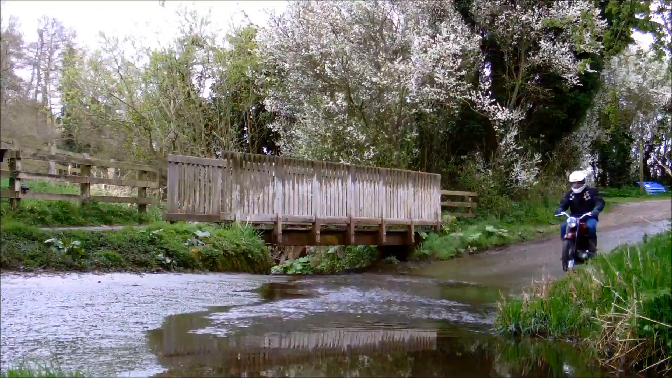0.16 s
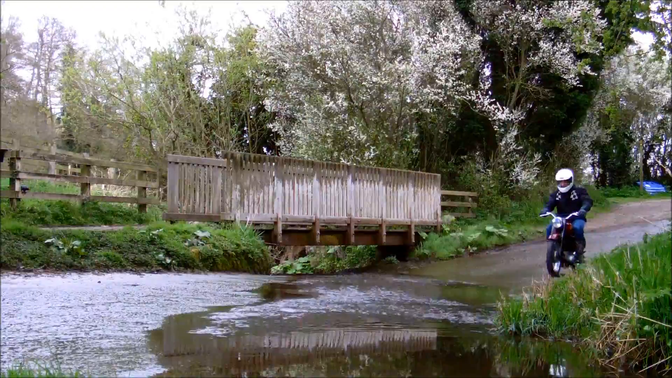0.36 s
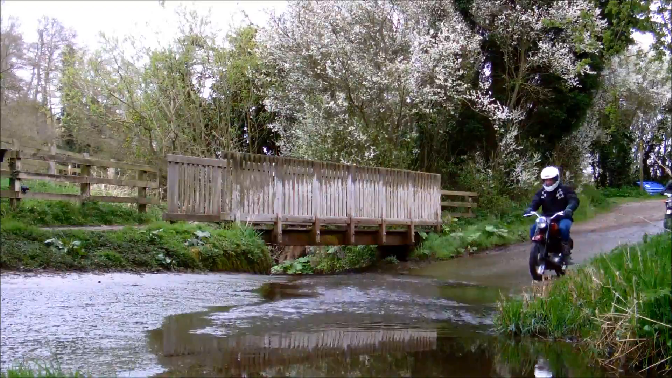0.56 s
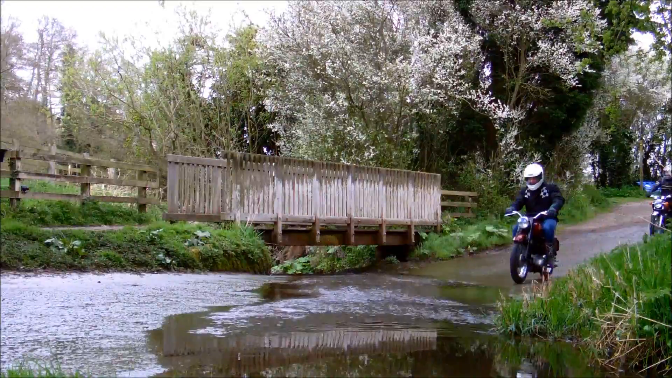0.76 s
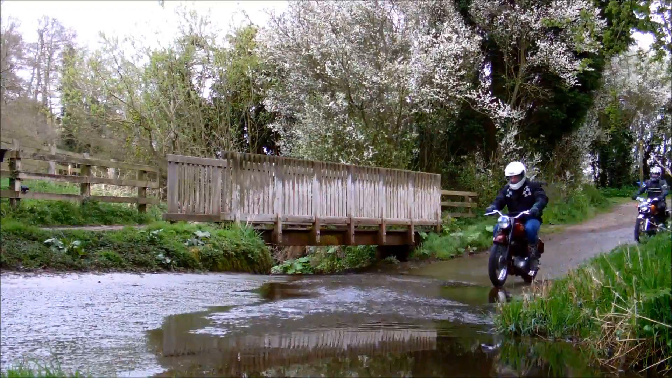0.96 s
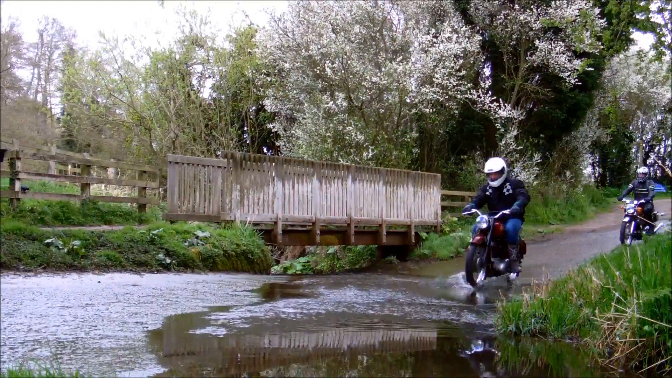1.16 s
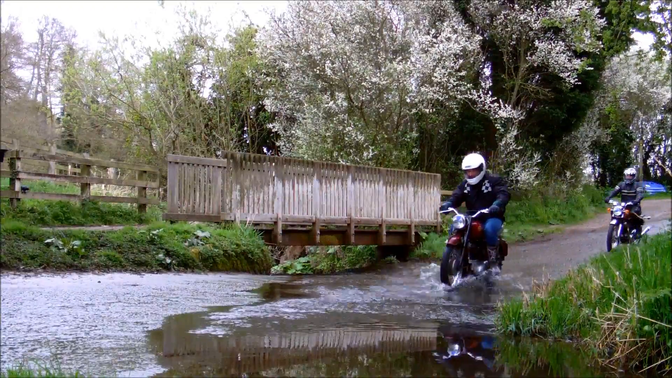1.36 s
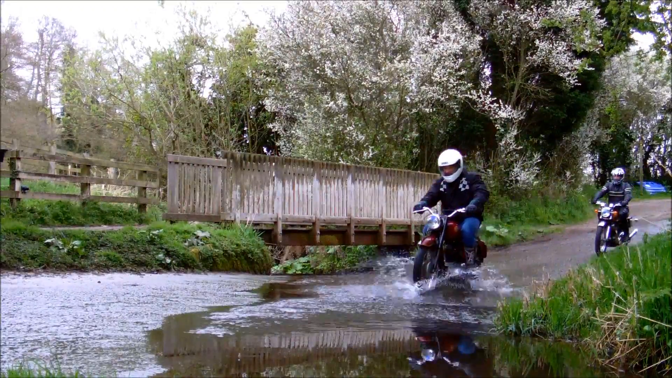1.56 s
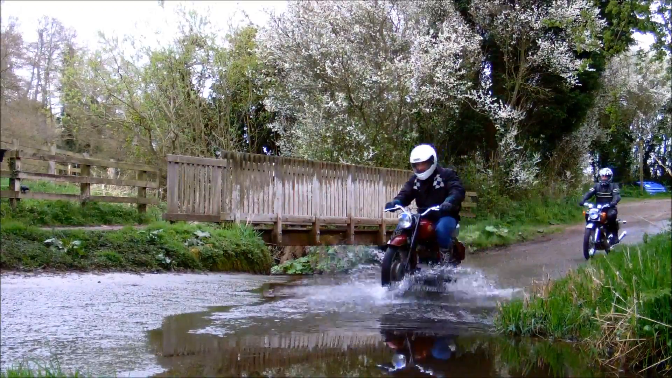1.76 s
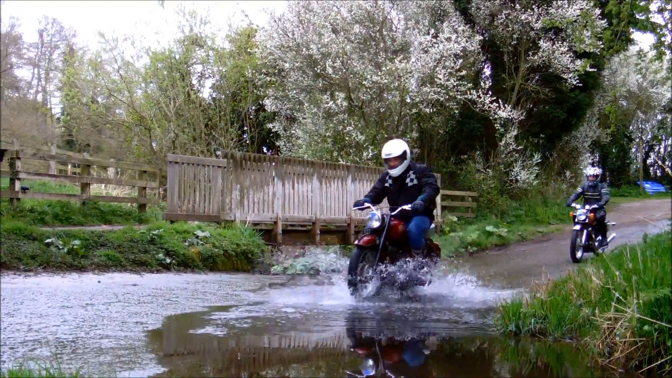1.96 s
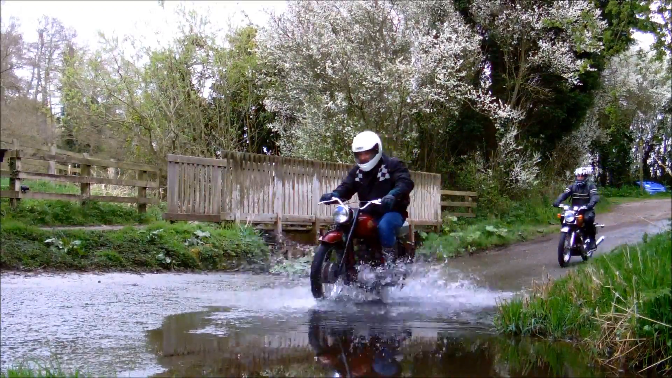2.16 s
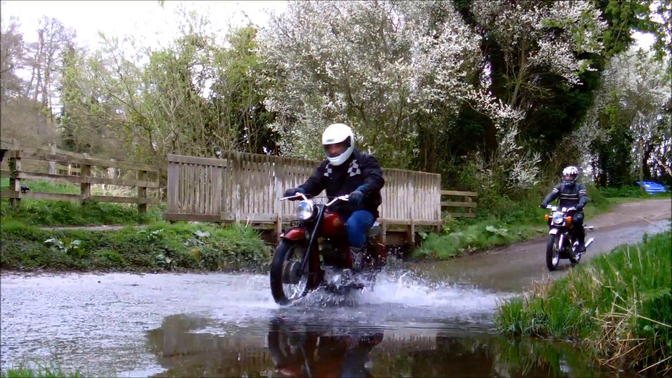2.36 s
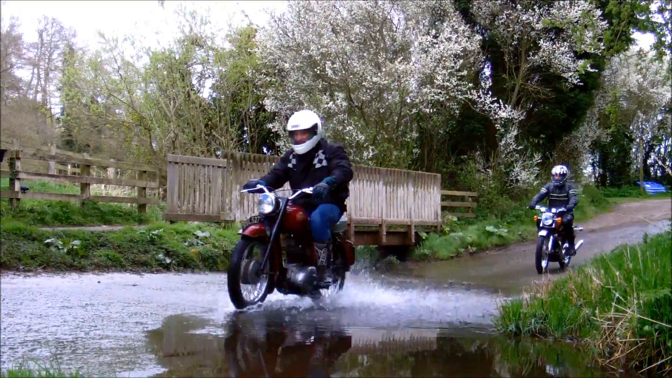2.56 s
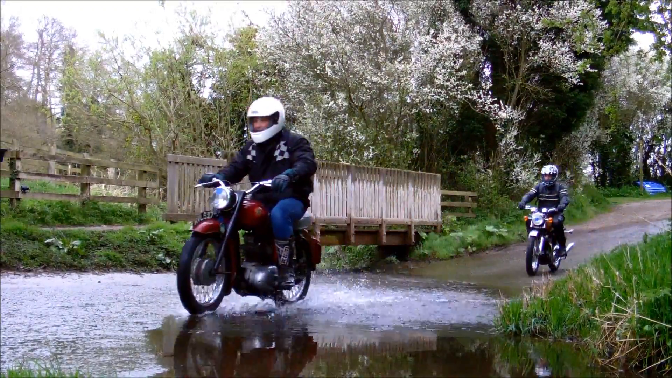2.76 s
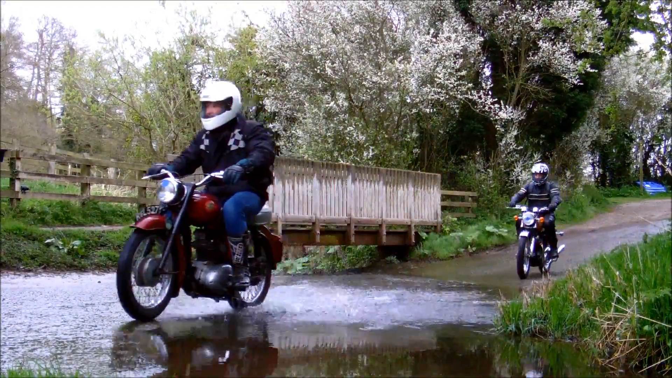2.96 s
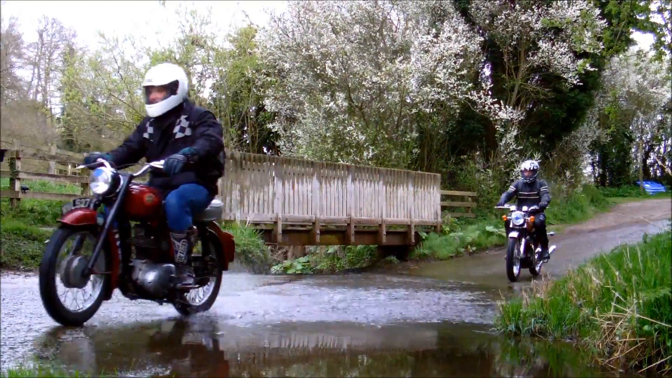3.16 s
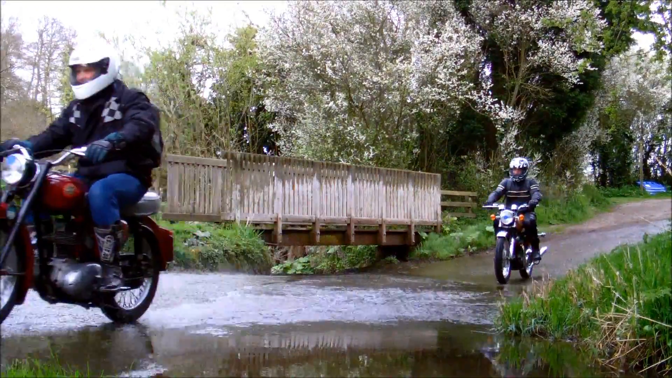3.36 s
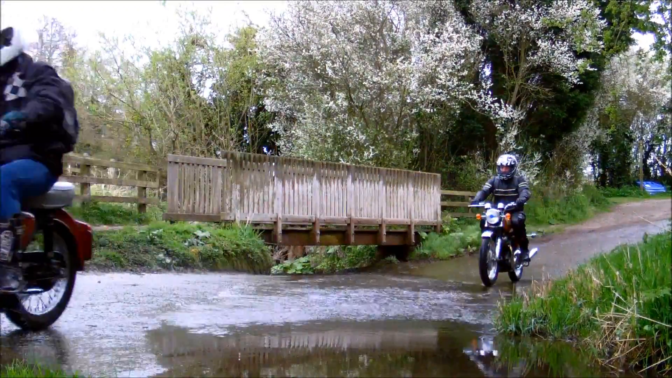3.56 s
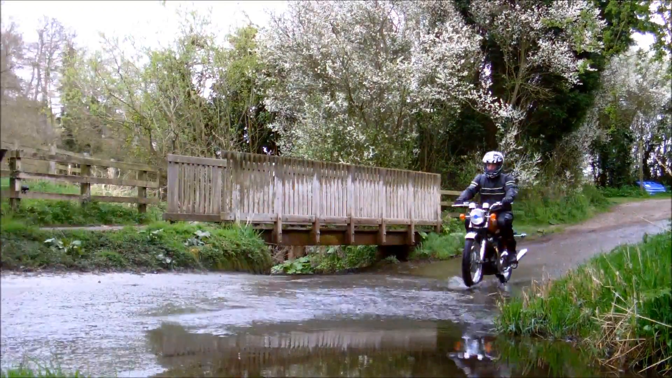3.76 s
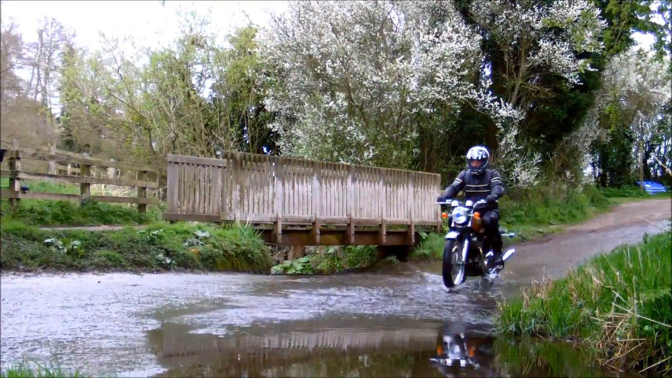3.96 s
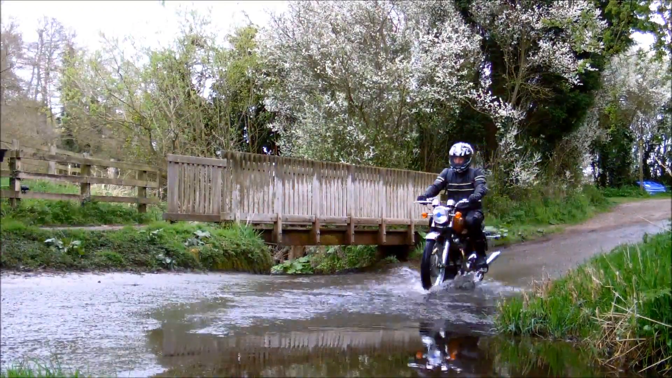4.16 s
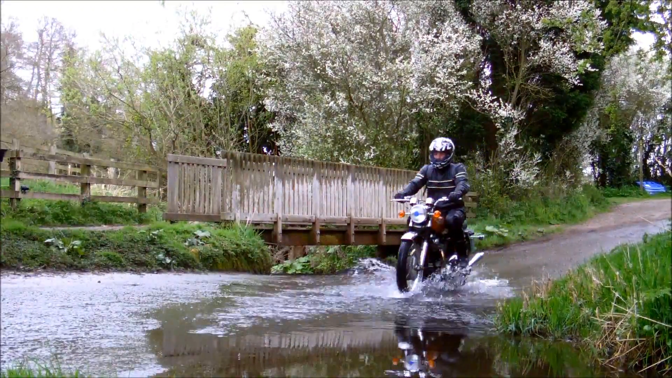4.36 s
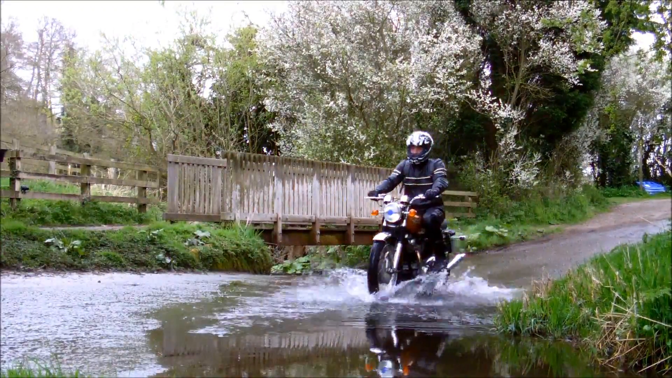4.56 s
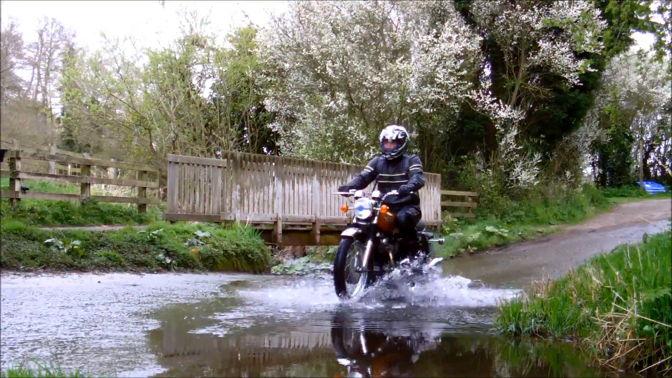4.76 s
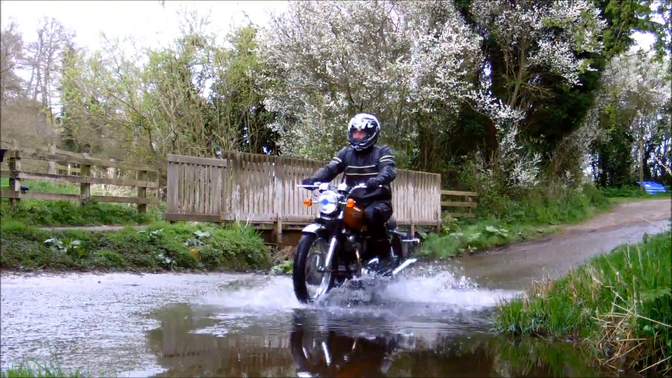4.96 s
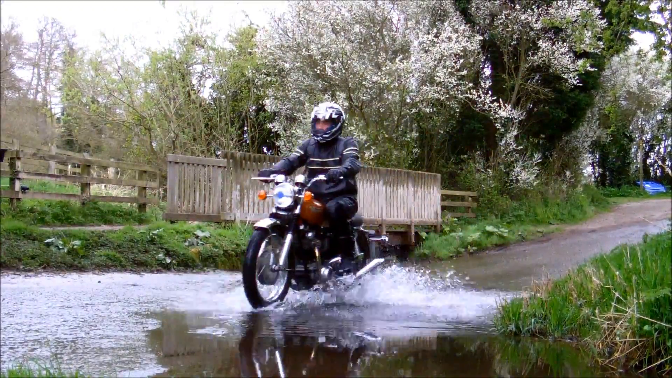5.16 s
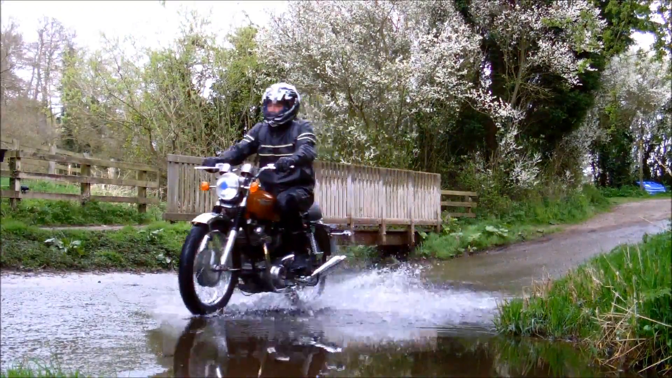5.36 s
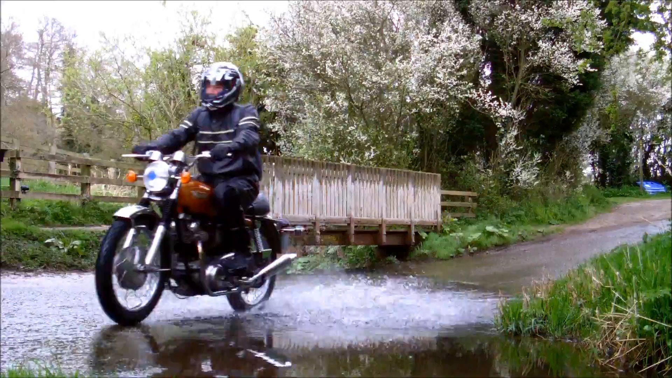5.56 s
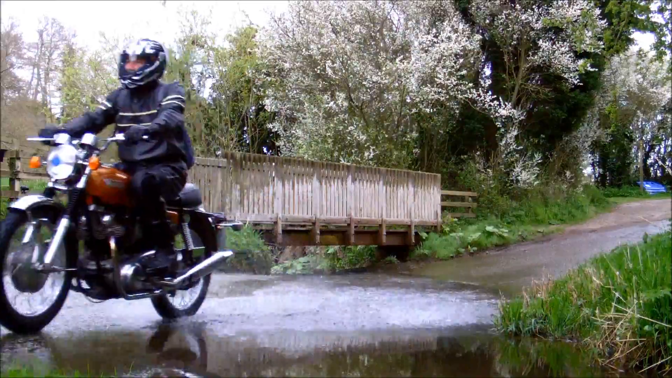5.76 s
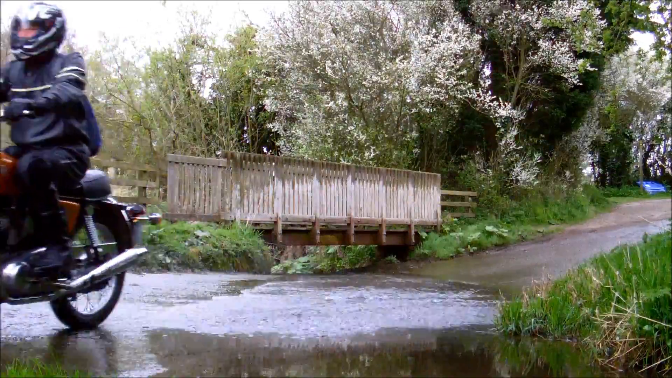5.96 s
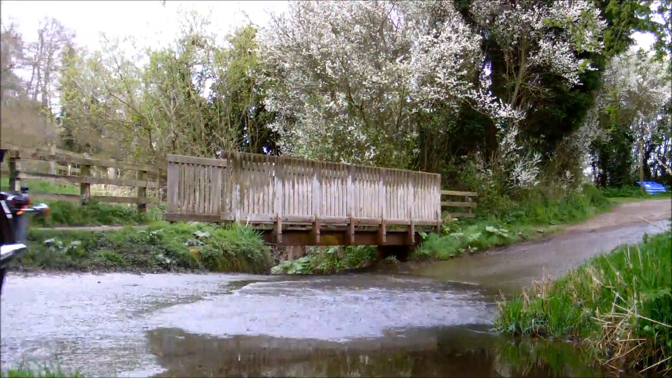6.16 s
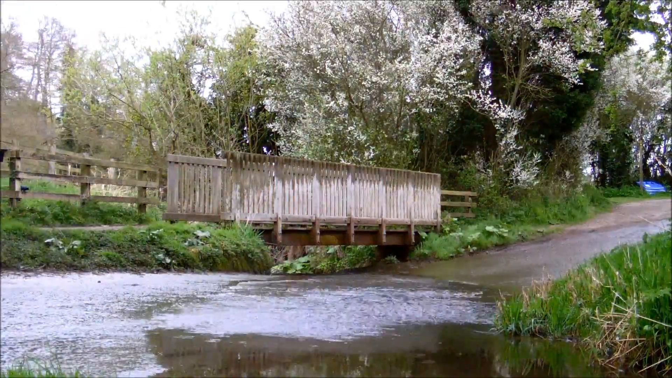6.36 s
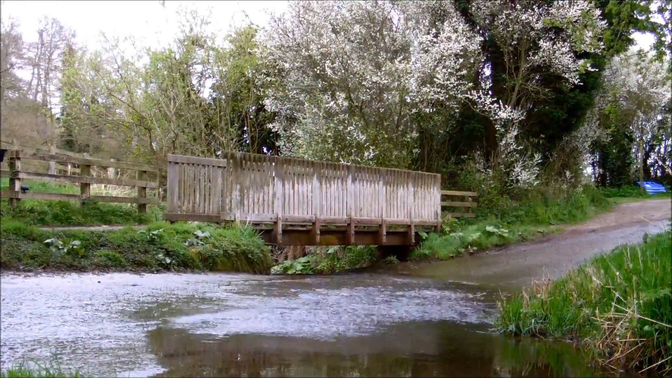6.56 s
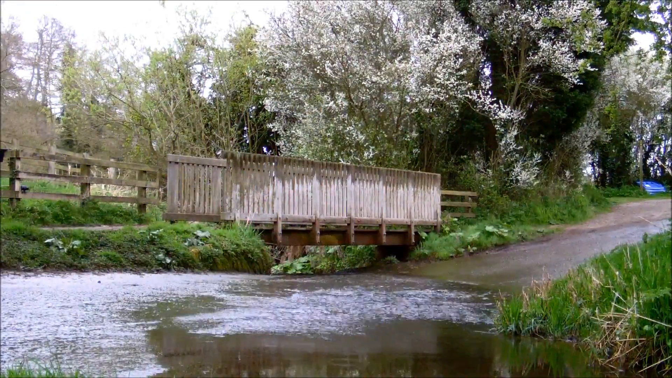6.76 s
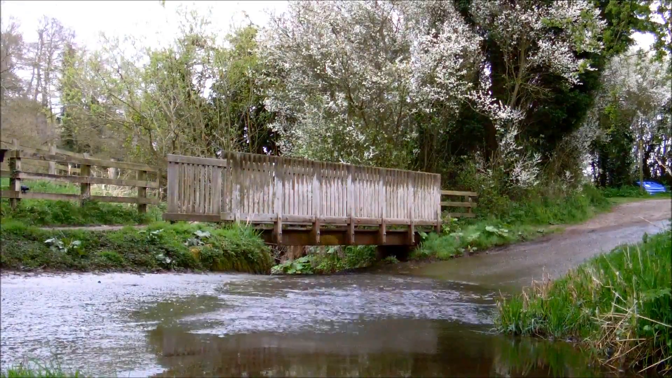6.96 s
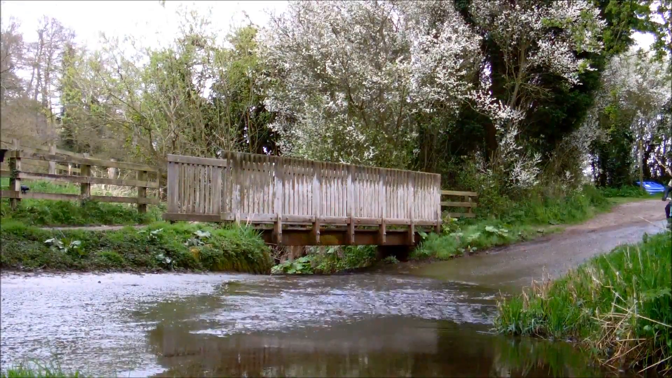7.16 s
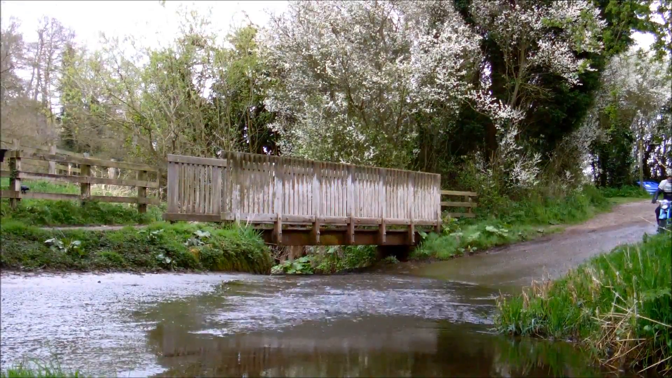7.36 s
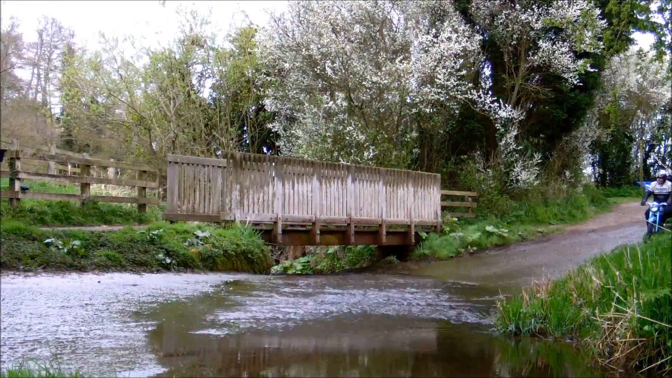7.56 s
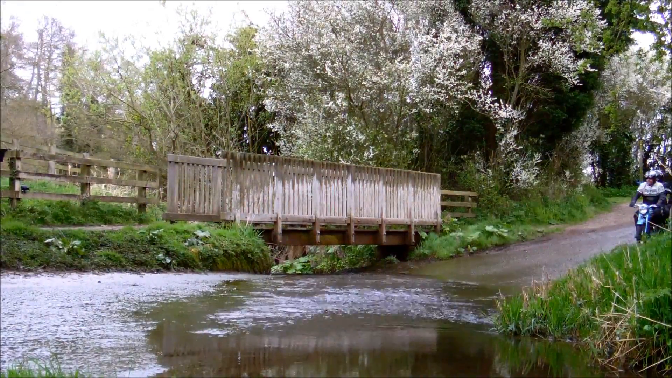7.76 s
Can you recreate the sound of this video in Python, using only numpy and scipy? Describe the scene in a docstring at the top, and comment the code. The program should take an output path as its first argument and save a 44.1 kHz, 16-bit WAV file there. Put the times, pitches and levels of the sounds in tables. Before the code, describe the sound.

An old four-stroke motorcycle approaches outdoors with a thumping exhaust and ticking valves, a second one behind it, over the soft, steady hiss of a stream. At about 1 second the first eases off and enters shallow water; spray builds, with slapping splashes between 2 and 2.5 seconds. Near 2.8 seconds it accelerates, gives one sharp exhaust crack at 3.2 and passes close at about 4 seconds, its pitch rising as it moves away. The second enters the water at that moment, splashing hardest from 4.8 to 5.5 seconds. It opens up and passes at about 6.3 seconds with a harder, chattering engine, its exhaust crackling rapidly and sharply as it leaves. The spray dies down and the engines recede, still climbing in pitch, while fine drops fizz on the water until the end, near 8 seconds. Trees add a faint, dull echo.

```python
"""Two old four-stroke motorcycles ride through a shallow ford over a hissing stream.
At 1 s the first enters the water and throws spray; each engine cycle gives an exhaust thump, a rasp
of gas and a clatter of valves. It opens up and passes the microphone at 3.9 s, as the second enters.
The second opens up too and passes at 6.3 s; as it leaves, its silencers face the microphone and
crack sharply. Fine drops fizz on the water to the end."""
import sys
import numpy as np
from scipy import signal
from scipy.fft import rfft, irfft
from scipy.io import wavfile
from scipy.ndimage import uniform_filter1d

SR = 44100
rng = np.random.default_rng(int(sys.argv[2]) if len(sys.argv) > 2 else 0)


def dump(signal):
    """Clip the signal to [-1, 1] and save it as 16-bit WAV at the path in sys.argv[1]."""
    limited = np.clip(np.atleast_2d(signal).T, -1, 1)
    pcm = np.round(limited * 32767).astype(np.int16)
    wavfile.write(sys.argv[1], SR, pcm)


N = 343980
TIME = np.arange(N) / SR

# Straight rides. Each: time abreast in s, speed in m/s, nearest distance in m.
FIRST_RIDE = (3.933, 3.61, 3.32)
SECOND_RIDE = (6.314, 3.48, 3.44)
# Each row: time in s, opening 0-1.
SECOND_THROTTLE = [(0, .1), (5.1, .1), (5.8, 1), (7.07, .98), (7.16, .55), (7.42, 0.99), (7.8, 0.62)]
# Exhaust spectra. Each row: frequency in Hz, relative level in dB.
THUMP_SPECTRUM = [(25, -45), (50, -30), (80, -27), (110, -6), (150, 0), (190, 0.5), (240, 6), (330, -8),
                  (500, -1.5), (1000, -33)]
RASP_SPECTRUM = [(40, -48), (150, -21), (300, -9.5), (420, 5), (600, 3.5), (800, 2.5), (1100, 2.5),
                 (1600, -12), (2600, -8), (4500, -2.5), (8000, -14.5), (15000, -34)]
BARK_SPECTRUM = [(40, -48), (200, -30), (500, -25), (1200, -13), (2000, -14), (3000, -10), (4200, -1),
                 (5400, -1), (6500, -14), (8500, -20), (10500, -21.5), (13000, -24.5), (15000, -25.5)]
# Each row, one per bike: wheels in at s, wheels out at s, spray in dB, drizzle in dB.
CROSSINGS = [(1.0, 4.32, -24.5, -55), (3.9, 5.46, -23.5, -50.5)]


def first_bike(beam_deg=12.6):
    """Soft single: exhaust beat, its echo in the pipe, intake honk half a cycle after firing."""
    # Each row: time in s, opening 0-1.
    throttle = [(0, 0.5), (1.3, 0.3), (2.45, 0.1), (2.85, 1), (4.05, 0.84), (5.3, 0.83), (6.3, 0.25),
                (7.8, 0.3)]
    # Each row: level in dB, drop with throttle shut in dB, aim in degrees, drop 90 degrees off in dB.
    voices = [ (-46, 10.5, 206, 5), (-35, 7.5, 173, 4), (-23, 2.5, 54, 4.5), (-28, 4, 109, 31),
              (-41.5, 15, 74, 14)]
    # Pipe and casing resonances. Each row: frequency in Hz, width in Hz, level in dB, aim in degrees.
    beamed_modes = [(653, 150, -40.5, 114.7), (780, 51, -41.5, 129), (1130, 65, -44.5, 57),
                    (1450, 170, -42, 124.4), (1760, 120, -56, 98), (2510, 210, -35, 47.5),
                    (2655, 130, -34, 98), (2845, 150, -30.5, 114.4), (3810, 170, -30.5, 56)]
    thump, rasp, valves, edge, intake = voice_gains(voices, FIRST_RIDE, throttle)
    proximity, angle_deg = distance_gain(FIRST_RIDE), bearing_deg(FIRST_RIDE)
    cycles = first_cycles()
    fire = strokes(cycles, phase=-.05, scatter_db=.8)
    draw = strokes(cycles, phase=.48, scatter_db=.8)
    echo = strokes(cycles, phase=.12, scatter_db=.8)
    beat = unit(colour(fire + .23 * draw + .27 * echo, THUMP_SPECTRUM))
    # Clean pressure pulses, turbulent gas behind them.
    pulses = unit(fire + .5 * echo + .35 * draw)
    gas = puffs(fire + .76 * draw, rise_s=.0069, decay_s=.015)
    pipe_note = unit(resonate(resonate(pulses, 640, 580), 920, 990))
    suction = unit(draw + .6 * fire) + .15 * puffs(draw, rise_s=.001, decay_s=.006)
    honk = unit(resonate(resonate(suction, 400, 110), 420, 150))
    bark_hits = strokes(cycles, phase=-.0094, scatter_db=-.2)
    bark = colour(puffs(bark_hits, rise_s=.00043, decay_s=.0069), BARK_SPECTRUM)
    # One tappet stands out from afar, the whole valve train close by.
    far = clatter(cycles, [(-.36, -4), (-.26, 0), (-.14, -4)], decay_s=.006, ring_db=-3, scatter_db=1.5)
    far = unit(far + undb(.5) * resonate(far, 5640, 130))
    close = clatter(cycles, [(-.3, -12), (-.05, 7.5), (.2, -6), (.43, 4)], decay_s=.0081,
                    ring_db=1.5 + 2 * np.cos(np.radians(angle_deg)), scatter_db=3.5)
    close_share = np.clip(2.9 * (proximity - .22), 0, .96)
    exhaust = unit(unit(colour(gas, RASP_SPECTRUM)) + .38 * pipe_note)
    out = thump * beat + rasp * exhaust + intake * honk + edge * bark
    out += valves * (np.sqrt(1 - close_share) * far + np.sqrt(close_share) * close)
    for hz, width_hz, db, aim_deg in beamed_modes:
        beam = proximity * np.exp(-((angle_deg - aim_deg) / beam_deg) ** 2)
        out += undb(db) * beam * ring(pulses + gas / 2, hz, width_hz)
    return out


def second_bike():
    """Harder engine: valve gear chatters up to each firing, which leaves the pipe with a sharp edge."""
    # Each row: level in dB, drop with throttle shut in dB, aim in degrees, drop 90 degrees off in dB.
    voices = [ (-50.5, 3, 200, 7.5), (-41.5, -5, 180, 2.5), (-22, 5.5, 27, 5), (-31, 20, 106, 8)]
    thump, rasp, valves, edge = voice_gains(voices, SECOND_RIDE, SECOND_THROTTLE)
    cycles = second_cycles()
    fire = strokes(cycles, phase=.00099, scatter_db=5)
    pulses = unit(fire + .25 * strokes(cycles, phase=.2, scatter_db=2))
    beat = unit(colour(pulses + .3 * puffs(fire, rise_s=.002, decay_s=.012), THUMP_SPECTRUM))
    gas = puffs(fire, rise_s=.00082, decay_s=.0047) + .41 * unit(fire) + .73 * noise()
    exhaust = unit(colour(gas, RASP_SPECTRUM))
    bark_hits = strokes(cycles, phase=.02, scatter_db=2)
    bark = colour(puffs(bark_hits, rise_s=.001, decay_s=.0025), BARK_SPECTRUM)
    chatter = clatter(cycles, [(-.48, -5.5), (-.32, -5.5), (-.17, -4), (.03, -14)],
                      decay_s=.0077, ring_db=-30, scatter_db=7)
    return thump * beat + rasp * exhaust + edge * bark + valves * chatter


def silencer_cracks(crack_s=.002, leak_s=.008, leak_db=-15, near_lag_cycles=.035, far_lag_cycles=.09):
    """The second bike's two silencers fire in turn: bursts of ragged gas, brighter from behind."""
    # Each row: level in dB, drop with throttle shut in dB, aim in degrees, drop 90 degrees off in dB.
    silencers = [(-10.3, 12, 119, 32), (-15.8, 10, 110, 44)]
    # Each row: frequency in Hz, relative level in dB.
    crack_spectrum = [(40, -42), (200, -20.5), (500, -26), (750, -7), (1200, -24), (2000, -10.5),
                      (3000, -4), (4200, -3.5), (5400, 8.5), (6500, -4), (8500, -18.5), (10800, -17.5),
                      (13000, -26.5), (15000, -26.5)]
    cycle_pairs = second_cycles() / 2
    near, far = voice_gains(silencers, SECOND_RIDE, SECOND_THROTTLE)
    hits = near * strokes(cycle_pairs, phase=(1 + near_lag_cycles) / 2, scatter_db=1.5)
    hits += far * strokes(cycle_pairs, phase=far_lag_cycles / 2, scatter_db=3)
    # Gas leaks past the opening valve, bursts out, stops short.
    age_s = np.arange(-SR // 20, SR // 20 + 1) / SR
    leak = undb(leak_db) * np.exp(-np.abs(age_s) / leak_s) * (age_s < 0)
    envelope = leak + np.exp(-(age_s / crack_s) ** 2)
    gas = unit(grains(per_s=25000, spread_db=.5) + .27 * noise())
    burst = colour(signal.fftconvolve(hits, envelope, mode="same") * gas, crack_spectrum)
    treble = signal.sosfiltfilt(signal.butter(2, 8000, "high", fs=SR, output="sos"), burst)
    lift_db = 7 - 1.5 * np.cos(np.radians(bearing_deg(SECOND_RIDE)))
    return burst + (undb(lift_db) - 1) * treble


def clatter(cycles, strikes, decay_s, ring_db, scatter_db):
    """Valves and tappets ring the finned engine. Each strike: phase in cycles, level in dB."""
    # Cooling fins and cases. Each row: frequency in Hz, width in Hz, relative level in dB.
    fin_modes = [(1660, 24, -6), (2282, 31, 4), (2670, 45, 4.5), (2866, 42, 9), (3850, 8, 15),
                 (4383, 118, 13.5)]
    # Each row: frequency in Hz, relative level in dB.
    clatter_spectrum = [(40, -84), (300, -27.5), (1200, -23), (2000, -17), (2700, -17), (3600, -9.5),
                        (4400, -9.5), (4800, -1.5), (5450, 3.5), (5900, -3), (6500, -12.5), (8000, -25),
                        (12500, -56), (15000, -40.5)]
    hits = sum(undb(db) * strokes(cycles, phase, scatter_db) for phase, db in strikes)
    rattle = puffs(hits, rise_s=.0048, decay_s=decay_s) + undb(-4) * grains(per_s=2200, spread_db=5)
    fins = sum(undb(db) * resonate(rattle, hz, width_hz) for hz, width_hz, db in fin_modes)
    fins = signal.lfilter(*signal.butter(2, 1500, "high", fs=SR), fins)
    return unit(colour(rattle, clatter_spectrum) + undb(ring_db) * fins)


def gear_whine(teeth=32, case_hz=759, case_width_hz=12):
    """The first bike's timing gears sing, throb with each firing and swell at their case's resonance."""
    cycles = first_cycles()
    throb = (1 + .45 * np.cos(2 * np.pi * cycles)) * undb(2.5 * drift(14))
    mesh = np.sin(2 * np.pi * teeth * cycles + .5 * drift(14))
    case = resonate(resonate(mesh, case_hz, case_width_hz), case_hz, 4 * case_width_hz)
    return distance_gain(FIRST_RIDE) * throb * (undb(-55.5) * mesh + undb(-35) * case)


def spray(drum_delay_s=.57, drum_s=.49):
    """Water drums on the mudguards and tears into drops that patter and plink back."""
    # Each row: frequency in Hz, width in Hz, level in dB.
    mudguard_modes = [(1820, 220, -41), (2880, 710, -38.5)]
    # Sheets of water slapping back. Each row: peak time in s, half-width in s, level in dB.
    splashes = [(2.137, 0.011, -29), (2.365, 0.026, -27.5), (2.48, 0.016, -34), (4.84, 0.014, -24),
                (5.12, .03, -28), (5.318, 0.013, -24.5), (5.5, 0.019, -40), (5.54, 0.0048, -25),
                (6.194, 0.001, -21)]
    # Each row: frequency in Hz, relative level in dB.
    water_spectrum = [(40, -71), (300, -24), (900, -11.5), (1800, -9.5), (2800, -2.5), (4000, -0.5),
                      (5400, 6), (6500, -5), (8300, -23), (10500, -24), (12700, -50), (15000, -24)]
    plinks = unit(sum(resonate(grains(per_s=40, spread_db=3), hz, hz / 14)
                      for hz in np.geomspace(1400, 6000, 24)))
    drops = unit(grains(per_s=3000, spread_db=-2) + 1.18 * noise() + .58 * plinks)
    drops *= undb(drift(18) + drift(7) / 2)
    power, drumming = 0, 0
    for ride, (in_s, out_s, db, _) in zip((FIRST_RIDE, SECOND_RIDE), CROSSINGS):
        power += (undb(db) * distance_gain(ride) * wash(in_s, out_s, fall_s=.4)) ** 2
        drumming += distance_gain(ride) * np.exp(-((TIME - in_s - drum_delay_s) / drum_s) ** 2)
    mudguards = sum(undb(db) * ring(drops, hz, width_hz) for hz, width_hz, db in mudguard_modes)
    sheets = sum(undb(db) * np.exp(-((TIME - at_s) / half_s) ** 2) for at_s, half_s, db in splashes)
    water = unit(colour(drops, water_spectrum)) * np.sqrt(power + sheets ** 2)
    return water + drumming * mudguards


def sharp_ticks():
    """Sharp ticks: flicked grit and drops, and two cracks from the first bike's exhaust."""
    # The exhaust cracks are at 3.2 and 4.7 s. Each row: peak time in s, level in dB.
    ticks = [(0.243, -33), (.274, -37), (.706, -29.5), (1.153, -28.5), (3.199, -14.5), (4.742, -30),
             (5.336, -26)]
    envelope = sum(undb(db) * np.exp(-np.abs(TIME - at_s) / .0028) for at_s, db in ticks)
    return colour(envelope * noise(), [(100, -52), (1000, -6), (5500, 20), (8500, -2), (15000, -18)])


def drizzle(delay_s=.44):
    """Tiny drops fizz on the water long after the wheels have gone through."""
    envelope = sum(undb(db) * wash(in_s + delay_s, out_s + delay_s, fall_s=5)
                   for in_s, out_s, _, db in CROSSINGS)
    drops = grains(per_s=3100, spread_db=7)
    return envelope * colour(drops, [(3000, -25), (7000, 9), (10000, 5), (13000, -1), (15000, 1.5)])


def tree_echo(x, rise_s=.02, decay_s=.07):
    """Trees and a footbridge scatter a thin, dull echo."""
    t = TIME[:SR // 2]
    tail = rng.standard_normal(len(t)) * np.exp(-t / decay_s) * (1 - np.exp(-t / rise_s))
    echo = signal.fftconvolve(x, tail / np.linalg.norm(tail))[:N]
    return undb(-14) * signal.lfilter(*signal.butter(1, 5000, fs=SR), echo)


def stream():
    """Shallow water runs over the ford with a slightly restless hiss."""
    # Each row: frequency in Hz, relative level in dB.
    stream_spectrum = [(18, -70), (30, -41), (136, -19), (296, -27.5), (426, -33.5), (905, -10),
                       (1110, -11.5), (1870, -13), (2920, -6.5), (3980, -9), (5580, -5.5), (7430, -55),
                       (15000, -31.5)]
    flow = unit(noise() + .5 * grains(per_s=1400, spread_db=1.5)) * undb(2.5 * drift(4))
    return undb(-46) * colour(flow, stream_spectrum)


def first_cycles():
    """Running count of the first bike's engine cycles."""
    # Each row: time in s, firing rate in Hz.
    firing_rate = [(0, 19.0), (1, 17.85), (1.7, 15.92), (2.65, 15.63), (2.9, 19.24), (3.1, 21.4),
                   (3.4, 21.08), (3.8, 20.58), (4.05, 22.2), (4.3, 23.74), (4.6, 23.39), (4.85, 25.06),
                   (5.4, 25.05), (7.8, 27)]
    return .3 + np.cumsum(curve(firing_rate)) / SR


def second_cycles():
    """Running count of the second bike's engine cycles."""
    # Each row: time in s, firing rate in Hz.
    firing_rate = [(0, 18.06), (4.5, 18.08), (5.6, 19.31), (6, 20.53), (6.3, 20.71), (6.55, 21.98),
                   (6.9, 22.87), (7.2, 24.48), (7.5, 25.12), (7.8, 26.18)]
    return np.cumsum(curve(firing_rate)) / SR


def strokes(cycles, phase, scatter_db):
    """One impulse of uneven size each time the cycle passes the phase."""
    onsets = np.flatnonzero(np.diff(np.floor(cycles - phase)) > 0)
    sizes = undb(scatter_db * rng.uniform(-1.54, 1, size=400))
    return np.bincount(onsets, sizes[:len(onsets)], N)


def puffs(hits, rise_s, decay_s):
    """A noise burst after each impulse, rms 1."""
    t = TIME[:SR // 10]
    envelope = (1 - np.exp(-t / rise_s)) * np.exp(-t / decay_s)
    return unit(signal.fftconvolve(hits, envelope)[:N] * noise())


def voice_gains(voices, ride, throttle):
    """Gain of each voice of a bike from throttle, distance and heading."""
    shut = 1 - np.clip(curve(throttle), 0, 1)
    gains = []
    for db, shut_db, aim_deg, side_db in voices:
        off_axis = 1 - np.cos(np.radians(bearing_deg(ride) - aim_deg))
        gains.append(distance_gain(ride) * undb(db - shut_db * shut - side_db * off_axis))
    return gains


def distance_gain(ride):
    """1 / distance law; 1 at the nearest point."""
    abreast_s, speed_m_s, nearest_m = ride
    return nearest_m / np.hypot(speed_m_s * (TIME - abreast_s), nearest_m)


def bearing_deg(ride):
    """The microphone as the rider sees it: 0 ahead, 90 abreast, 180 behind."""
    abreast_s, speed_m_s, nearest_m = ride
    return np.degrees(np.arctan2(nearest_m, speed_m_s * (abreast_s - TIME)))


def wash(start_s, end_s, fall_s, rise_s=.6):
    """Thrown water builds up from the start and dies away after the end."""
    build = 1 - np.exp(-np.maximum(TIME - start_s, 0) / rise_s)
    return build * np.exp(-np.maximum(TIME - end_s, 0) / fall_s)


def grains(per_s, spread_db):
    """Random tiny impacts of uneven size, rms 1."""
    sizes = undb(spread_db * np.minimum(rng.exponential(size=N), np.pi))
    return unit((rng.random(N) < per_s / SR) * sizes * np.sign(noise()))


def colour(x, spectrum, size=8192):
    """Minimum-phase filter through (Hz, dB) points; keeps the power of white noise."""
    hz, db = np.transpose(spectrum)
    bin_hz = np.arange(size // 2 + 1) * SR / size
    gain = unit(undb(np.interp(np.log(bin_hz + 1), np.log(hz), db)))
    cepstrum = irfft(np.log(gain))
    cepstrum[1:size // 2] *= 2
    cepstrum[size // 2 + 1:] = 0
    return signal.fftconvolve(x, irfft(np.exp(rfft(cepstrum))))[:N]


def resonate(x, hz, width_hz):
    """One resonance, gain 1 at its centre."""
    return signal.lfilter(*signal.iirpeak(hz, hz / width_hz, fs=SR), x)


def ring(x, hz, width_hz):
    """Steep-sided resonance, rms 1."""
    return unit(resonate(resonate(x, hz, width_hz), hz, 2 * width_hz))


def drift(rate_hz):
    """Slow random wander, rms 1."""
    hold = int(SR / rate_hz)
    steps = np.repeat(rng.standard_normal(N // hold + 2), hold)
    return unit(uniform_filter1d(steps, hold)[:N])


def noise():
    """White noise."""
    return rng.standard_normal(N)


def curve(rows):
    """Straight lines through (s, value) points."""
    return np.interp(TIME, *np.transpose(rows))


def unit(x):
    """Scale to rms 1."""
    return x / np.sqrt(np.mean(x ** 2) + 1e-18)


def undb(db):
    """Decibels to gain."""
    return 10 ** (np.asarray(db) / 20)


def scene():
    """Both bikes, the water they throw and their echo over the stream; mono."""
    bikes = first_bike() + gear_whine() + second_bike() + silencer_cracks()
    direct = bikes + spray() + sharp_ticks() + drizzle()
    return (direct + tree_echo(direct) + stream())[None]


def record(dry, top_hz=15500):
    """The microphone has two narrow dips, rounds the sharpest peaks and cuts the top."""
    # Each row: frequency in Hz, width in Hz.
    notches = [(298, 74), (905, 126)]
    for hz, width_hz in notches:
        dry = signal.lfilter(*signal.iirnotch(hz, hz / width_hz, fs=SR), dry)
    rounded = .9 * np.tanh(dry / .9)
    return signal.sosfilt(signal.ellip(10, .2, 80, top_hz, fs=SR, output="sos"), rounded)


dry = scene()
out = record(dry)
dump(out)
```